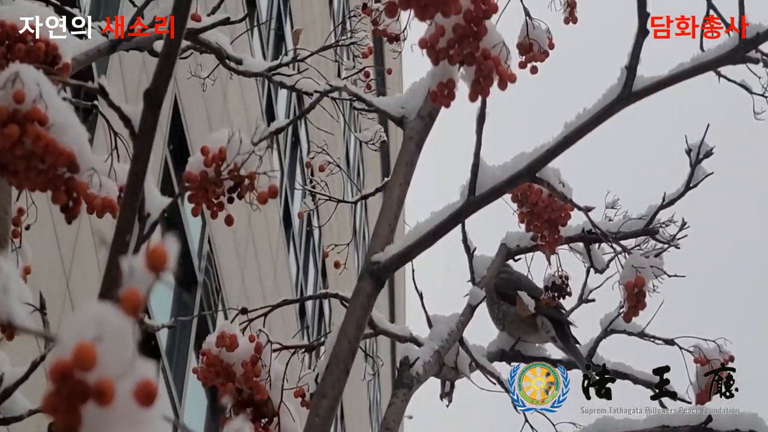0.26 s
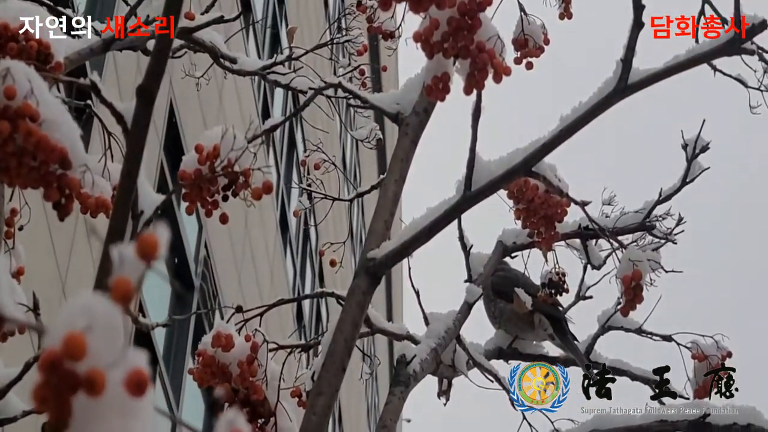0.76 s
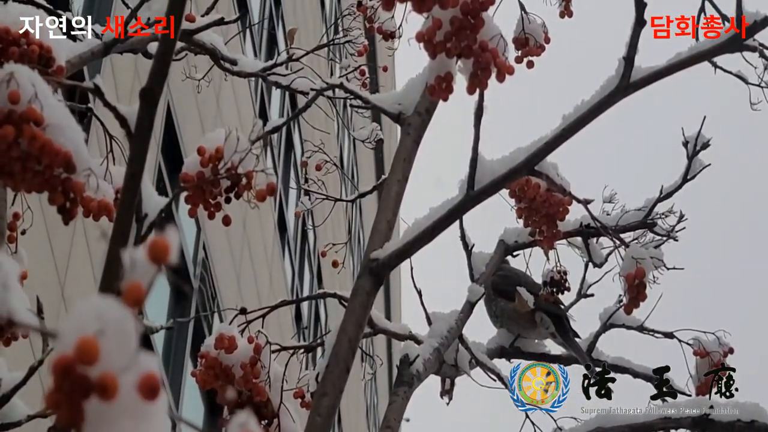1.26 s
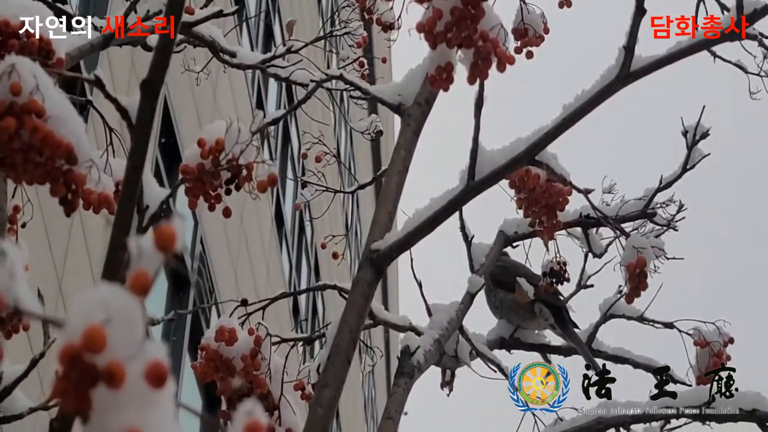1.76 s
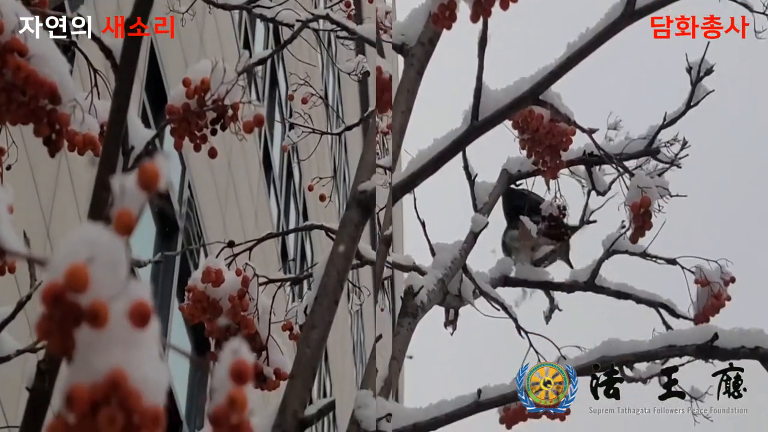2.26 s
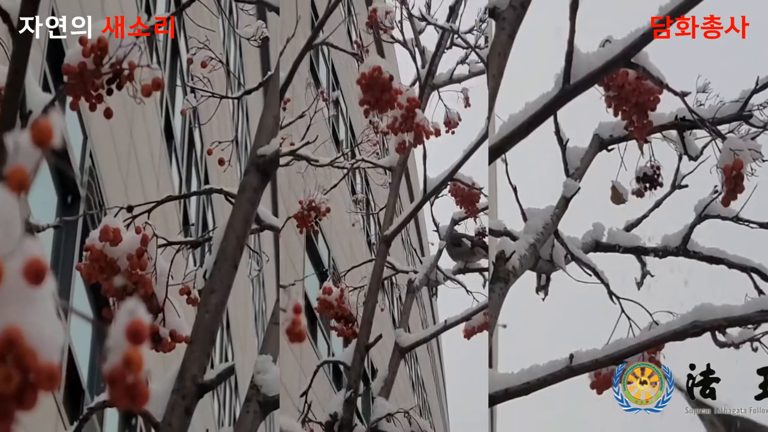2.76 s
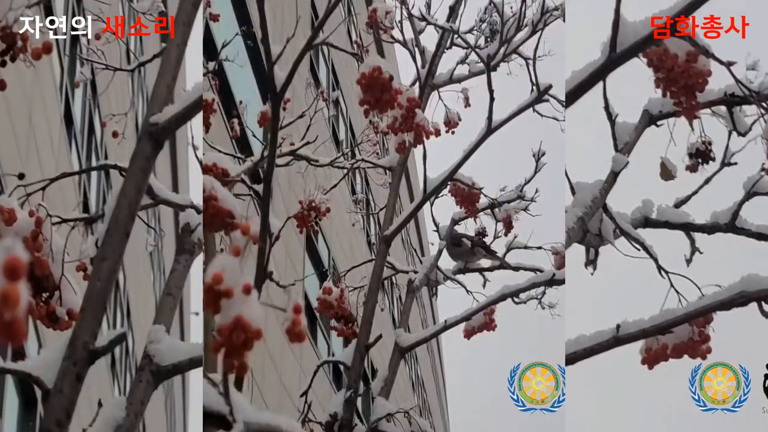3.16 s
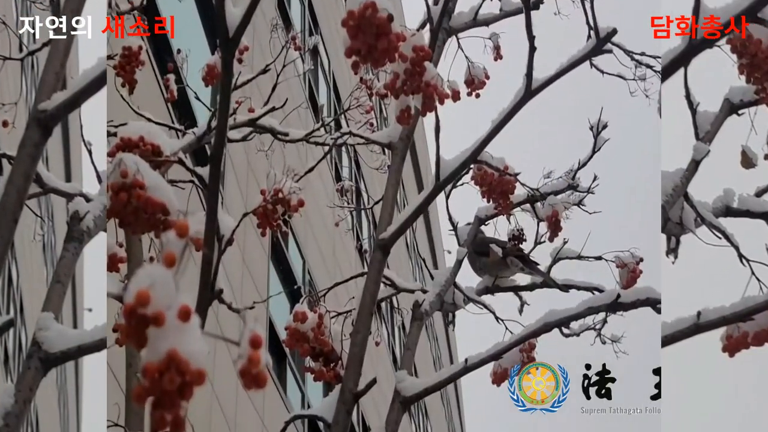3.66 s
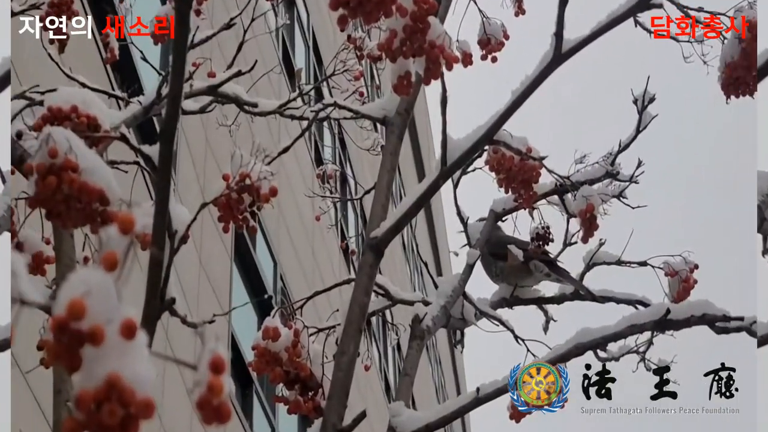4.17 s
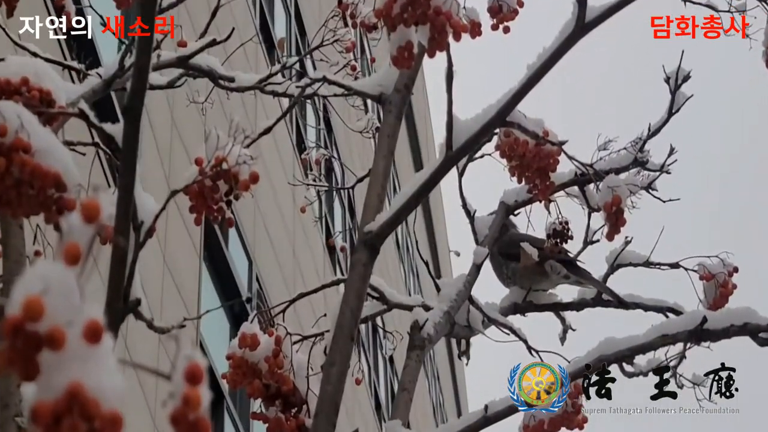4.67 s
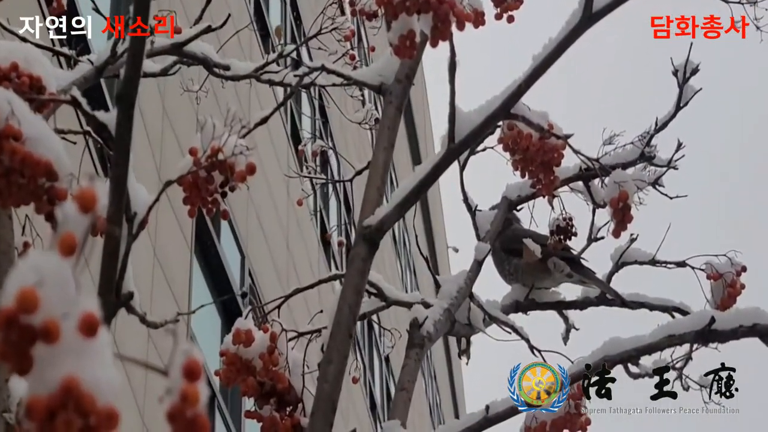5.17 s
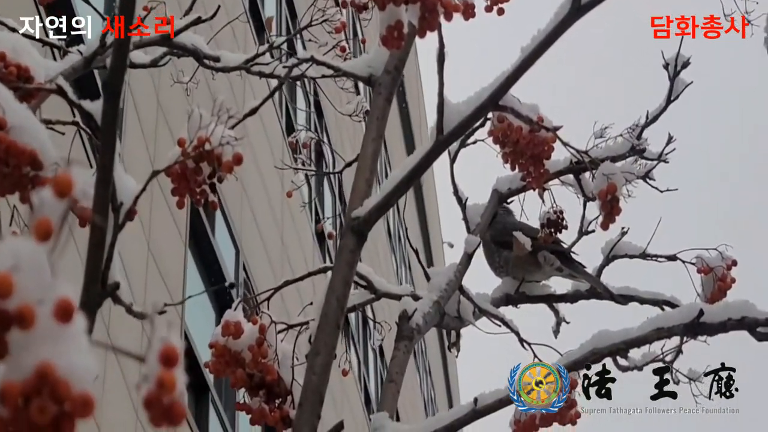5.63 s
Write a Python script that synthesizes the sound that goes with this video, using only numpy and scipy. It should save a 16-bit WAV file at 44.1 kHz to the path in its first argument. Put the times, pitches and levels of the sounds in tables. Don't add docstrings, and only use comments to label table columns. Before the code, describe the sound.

Outdoors near a building, a close stereo microphone picks up a small bird a few metres off, with short reflections. Three rough, breathy, high whistles come far apart: one already under way, one scooping up and cut short, one full and raspy with a falling end. Beneath lies distant town rumble with soft vehicle revs and hiss, one twig tick, and a brief fade near silence between the second and third calls.

```python
import sys
import numpy as np
from scipy import signal
from scipy.fft import rfft, irfft
from scipy.io import wavfile
from scipy.ndimage import uniform_filter1d, minimum_filter1d

SR = 44100
rng = np.random.default_rng(int(sys.argv[2]) if len(sys.argv) > 2 else 0)


def pcm_store(signal):
    levels = np.round(np.clip(np.atleast_2d(signal), -1, 1) * 32767)
    wavfile.write(sys.argv[1], SR, levels.astype(np.int16).T)


def undo_db(level):
    steps = np.asarray(level, float) / 20
    return 10 ** steps


N = 260190
CUT_S = 3.287


def level(x, db):
    return x * undo_db(db) / np.sqrt(np.mean(x ** 2))


def curves(table):
    s, *columns = np.transpose(table)
    return [np.interp(np.arange(N) / SR, s, c) for c in columns]


def at(table, hz):
    f, v = np.transpose(table)
    return np.interp(np.log(np.maximum(hz, 1)), np.log(f), v)


def colour(x, table):
    return irfft(rfft(x) * undo_db(at(table, np.fft.rfftfreq(N, 1 / SR))), N)


def walk(rate, count=1, size=N):
    k = max(int(SR / rate), 2)
    steps = np.repeat(rng.standard_normal((count, size // k + 1)), k, axis=1)
    w = uniform_filter1d(uniform_filter1d(steps, k, axis=1), k, axis=1)[:, :size]
    return w / w.std()


def band(x, hz, width):
    bell = np.exp(-.5 * ((np.fft.rfftfreq(N, 1 / SR) - hz) / width) ** 2)
    return irfft(rfft(x) * bell, N)


# t/s, level/dB
FADER = [(0, -0.5), (1.3, -.5), (1.7, 3), (2.1, -2), (2.75, -3.5), (3.1, -4.5), (3.286, -15.5),
         (3.289, -48.5), (3.335, -51), (3.4, -39), (3.47, -24), (3.52, -7), (3.75, -6.5), (4.2, -4),
         (4.8, -1.5), (5.9, 0.5)]
# f/Hz, level/dB (per Hz)
TOWN = [(11, -21.5), (18, -1.5), (64, 2), (120, -10), (146, -13.5), (313, -14), (415, -13), (452, -18.5),
        (551, -18), (774, -20.5), (1120, -26.5), (1760, -27.5), (4470, -45.5), (8800, -59.5),
        (15500, -72.5)]
# f/Hz, side minus mid level/dB
TOWN_SIDE = [(60, -18.5), (110, -13.5), (200, -13.5), (380, -4.5), (700, 0), (1290, 4), (2380, -2.5),
             (4400, 1), (8120, -13), (15000, 3)]


def town():
    fader_db = curves(FADER)[0]
    before = np.arange(N) < CUT_S * SR
    treble_db = -0.53 - 0.32 * np.clip(fader_db, -6, 0) * before
    mid = colour(rng.standard_normal(N), TOWN)
    side = colour(colour(rng.standard_normal(N), TOWN), TOWN_SIDE)
    spectrum = rfft(np.array([mid + side, mid - side]), axis=1)
    octave = np.log2(np.maximum(np.fft.rfftfreq(N, 1 / SR), 1))
    swell = walk(1.1)[0]
    out = 0
    for centre in range(4, 15):
        share = np.cos(np.pi / 2 * np.clip(octave - centre, -1, 1)) ** 2
        gain_db = 0.74 * swell + 1.4 * walk(7.3)[0] + treble_db * max(centre - 9, 0)
        out = out + irfft(spectrum * share, N, axis=1) * undo_db(gain_db)
    return level(out, -31.5) * undo_db(fader_db)


# t/s, hold t/s, drone level/dB, drone f/Hz, tyre hiss level/dB
TRAFFIC = [(0, .02, -33.5, 370.8, -38.5), (0.727, .02, -35, 377, -51.5), (0.955, .02, -37, 371.7, -66),
           (1.205, .02, -30.5, 373.6, -47), (1.57, .29, -27.5, 416.3, -47), (2.809, .03, -29, 411, -46),
           (3.14, .05, -34.5, 400, -66.5), (4.229, .02, -40, 360, -62), (5.244, .06, -27.5, 405, -50),
           (5.469, .02, -34.5, 371, -52), (5.867, .02, -40, 371, -61)]


def revs():
    s, hold, drone_db, hz, hiss_db = np.transpose(TRAFFIC)[..., None]
    t = np.arange(N) / SR
    rise_db_s, fall_db_s = 147.5, 100
    away_db = -rise_db_s * np.maximum(s - t, 0) - fall_db_s * np.maximum(t - s - hold, 0)
    drone_curve = np.maximum((drone_db + away_db).max(axis=0), -45.5)
    hiss_curve = np.maximum((hiss_db + away_db).max(axis=0), -63)
    return drone_curve, np.interp(t, (s + hold / 2)[:, 0], hz[:, 0]), hiss_curve


def traffic():
    drone_db, hz, hiss_db = revs()
    phase = 2 * np.pi * np.cumsum(hz) / SR
    a, b, c, d = walk(230, count=4)
    mid = a * np.sin(phase) + b * np.cos(phase)
    side = c * np.sin(phase) + d * np.cos(phase)
    ports = mid + .5 * side * np.array([[1], [-1]])
    drone = undo_db(drone_db - 8 + 2.4 * walk(14)[0]) * ports
    hiss = band(rng.standard_normal((2, N)), 1600, 1100)
    return drone + level(hiss, 0) * undo_db(hiss_db + 0.84 * walk(15)[0])


# t/s, peak level/dB, left minus right level/dB
SNAPS = [
    (1.475, -15, -12),
]


def snaps():
    out, t = np.zeros((2, N)), np.arange(200) / SR
    attack = 1 - np.exp(-t / 0.00018)
    tick = np.sin(2 * np.pi * 1500 * t) * np.exp(-t / 0.00029) * attack
    for s, db, pan_db in SNAPS:
        i = int(s * SR)
        out[:, i:i + len(t)] += undo_db(db + 6.0 + np.array([[.5], [-.5]]) * pan_db) * tick
    return out


def yard(x, t60_s=.15, wall_db=-43, far_db=-64, far_t60_s=.5):
    t = np.arange(SR // 2) / SR
    fall = undo_db(wall_db - 60 * t / t60_s) + undo_db(far_db - 60 * t / far_t60_s)
    echoes = rng.standard_normal((2, len(t))) * fall * (t > .004)
    return signal.fftconvolve(x, echoes, axes=1)[:, :N]


# t/s, level/dB, beak brightness level/dB (per octave), hoarseness level/dB
WHISTLES = [
    [(0, -22.5, -1.5, 1.5), (.22, -24.5, 0, 0), (.32, -22.5, 0.5, -0.5), (.4, -21.5, -16, 0.5),
     (.43, -20, -1, -5.5), (.59, -23, 2, -2.5), (.63, -19, -5, 4), (.672, -39, 2, 4.5), (.74, -58, 0, 9)],
    [(2.83, -49.5, 5.5, -1), (2.92, -22, 1, -2.5), (3.0, -22.5, -20, 4), (3.1, -20, -22, -3.5),
     (3.19, -22.5, -24.5, -3.5), (3.215, -30.5, -22, -8.5), (3.262, -30, -23, -5), (3.287, -34, -14, -2)],
    [(3.805, -54, -3, -10.5), (3.905, -26.5, 0, -20), (3.95, -28.5, -12, -1), (4.24, -25, 2, 0.5),
     (4.4, -29, 1, 0.5), (4.435, -24, 3.5, 0.5), (4.585, -23, -2.5, 0), (4.652, -18, 3, -2),
     (4.7, -57, -12, 10)],
]
# t/s, f/Hz
PITCH = [
    [(0, 1915), (.15, 1895), (.33, 1885), (.385, 1850), (.42, 1900), (.52, 1900), (.572, 1860)],
    [(2.83, 1700), (2.9, 1850), (2.96, 1960), (3.05, 1900), (3.15, 1885), (3.29, 1895)],
    [(3.8, 1760), (3.84, 1800), (3.88, 1870), (3.95, 1925), (4.25, 1930), (4.42, 1895), (4.54, 1835),
     (4.6, 1800)],
]
# fundamental level/dB, thirds level/dB, breath level/dB, flutter depth [factor], top
# hiss level/dB
VOICES = [
    (-6.5, -17.5, 0, .55, 2),
    (-7, -25, 0, 1.2, 0),
    (2.5, -6.5, 1, .45, 6.5),
]
# start t/s, slide start t/s, slide length t/s
PHRASES = [
    (-.2, .572, .084),
    (2.865, 9, .06),
    (3.842, 4.6, .052),
]


def syrinx(call):
    t = np.arange(N) / SR
    db, bright, hoarse_db = curves(WHISTLES[call])
    root_db, thirds_db, breath_db, flutter, top_db = VOICES[call]
    start, slide_s, length = PHRASES[call]
    slide = np.clip((t - slide_s) / length, 0, 1.04) ** 1.8
    since_start = np.maximum(t - start, 0)
    onset, settle = np.exp(-since_start / .026), np.exp(-since_start / .06)
    hz = curves(PITCH[call])[0] - 860 * slide
    root_db = root_db + .6 * hoarse_db + 16 * settle
    thirds_db = thirds_db + 2.5 * hoarse_db - 9.5 * slide
    breath_db = breath_db + hoarse_db + 18 * onset - 5 * np.sin(np.pi * np.minimum(slide, 1))
    flutter = flutter + .7 * slide + .8 * settle
    bright = bright - 36 * slide ** 2
    top_db = top_db + 8.1 * (t - start - .5) - 0.63 * hoarse_db
    return hz, root_db, thirds_db, breath_db, flutter, bright, top_db, db


# f/Hz, level/dB
THROAT = [(1200, -56), (1620, -34), (1770, -9), (1950, -4.5), (2250, -5), (2700, 1.5), (3800, -2),
          (5700, -4.5), (6700, -12.5), (7600, -11), (9400, -9), (10600, -29), (13000, -22.5), (15500, -24)]
# f/Hz, level/dB (per Hz)
BREATH = [
    [(880, -63), (1500, -38.5), (1900, -9.5), (2090, -25), (2590, -10.5), (3340, -15), (3760, -7.5),
     (5190, -12), (5780, -3), (6620, -16), (8210, -18), (13700, -32.5), (15500, -36.5)],
    [(880, -58), (1500, -34.5), (1920, -14), (2200, -17), (2940, -19), (3830, 1.5), (5140, -14),
     (5610, -15), (6620, -23.5), (7900, -19), (10500, -22.5), (12900, -24), (15500, -39)],
    [(1210, -42), (2050, -18), (2190, -22.5), (2530, -5.5), (3350, -14), (3930, -5.5), (5340, -10.5),
     (5860, -8.5), (6820, -11), (8080, -13), (10800, -24.5), (13700, -29), (15500, -33)],
]


def whistle(call):
    t = np.arange(N) / SR
    rows = WHISTLES[call]
    on = (t >= rows[0][0]) & (t < rows[-1][0])
    size = on.sum()
    hz, root_db, thirds_db, breath_db, flutter, bright, top_db, db = (c[on] for c in syrinx(call))
    jitter = .004 * walk(120, size=size)[0] + .002 * walk(25, size=size)[0]
    phase = 2 * np.pi * np.cumsum(hz * (1 + jitter)) / SR
    clear, hoarse = 0, 0
    for m in range(3, 19):
        k = m / 3
        gain = undo_db(at(THROAT, k * hz) + bright * max(np.log2(k / 2), 0) - 12.4 * (k > 3.5))
        a, b, c, d = walk(200 * k ** .6, count=4, size=size)
        a = a + .45 * k ** .3 * np.array([c, -c])
        b = b + .45 * k ** .3 * np.array([d, -d])
        cosine, sine = np.cos(k * phase), np.sin(k * phase)
        if m % 3 == 0:
            depth = flutter * .5 * k ** 0.94
            swell = undo_db(1.8 * walk(18, size=size)[0] + root_db * (m == 3)) / np.sqrt(1 + depth ** 2)
            clear = clear + gain * swell * ((1 + depth * a) * cosine + depth * b * sine)
        else:
            hoarse = hoarse + gain * undo_db(-7 * (m % 3 == 2)) * ((.1 + a) * cosine + b * sine)
    mid, side = (colour(rng.standard_normal(N), BREATH[call])[on] for _ in range(2))
    breath = mid + .5 * np.array([side, -side])
    top = signal.sosfilt(signal.butter(4, 7000, "high", fs=SR, output="sos"), breath)
    breath = (breath + (undo_db(top_db) - 1) * top) * undo_db(1.8 * walk(30, size=size)[0])
    voice = level(clear, 0) + level(hoarse, 0) * undo_db(thirds_db) + level(breath, 0) * undo_db(breath_db)
    loudness = np.sqrt(uniform_filter1d(np.mean(voice ** 2, axis=0), size=1800))
    out = np.zeros((2, N))
    out[:, on] = voice / loudness * undo_db(db)
    return out


# left port late by [samples], left minus right level/dB
BEARINGS = [
    (-1, -1.0),
    (6, -2.0),
    (1, 1.2),
]


def bird():
    out = 0
    for call, (lag, pan_db) in enumerate(BEARINGS):
        left, right = whistle(call)
        left = np.roll(left, lag) * (np.arange(N) < N - 9)
        out = out + np.array([left * undo_db(pan_db / 2), right * undo_db(-pan_db / 2)])
    return out


def thin_treble(x, patchy_db=4.0):
    hz, s, z = signal.stft(x, SR, nperseg=1536)
    bands = (np.log2(1 + hz / 3000) * 12).astype(int)
    power = [np.mean(np.abs(z[:, bands == b]) ** 2, axis=(0, 1)) for b in range(bands.max() + 1)]
    power = np.array(power)
    band_db = 10 * np.log10(uniform_filter1d(power, size=3, axis=1) + 1e-20)
    under_db = -minimum_filter1d(-band_db, size=5, axis=0) - band_db
    chance = rng.standard_normal((2, len(power), len(s) // 2 + 1))
    chance = np.repeat(chance, 2, axis=2)[..., :len(s)]
    lasting = uniform_filter1d(chance[1], size=3, axis=1) * 1.35
    reach = np.clip(np.log2(np.maximum(hz, 1) / 5000) + .5, 0, 1)[:, None]
    spared = ((under_db < 4)[bands] & (hz < 6300)[:, None]) | (hz < 1500)[:, None]
    lost = (lasting + under_db / 12)[bands] > 2.6 - 1.45 * reach + 9 * spared
    weak = np.abs(z) ** 2 < 1.3 * reach * power[bands]
    jump_db = (patchy_db * chance[0][bands] * (1 - 0.22 * spared) + 5.5) * reach
    gain = undo_db(jump_db) * ~lost * ~weak * (hz < 15300)[:, None]
    return signal.istft(z * gain, SR, nperseg=1536)[1][:, :N]


def scene():
    voice = bird()
    before = np.arange(N) < int(CUT_S * SR)
    echoes = yard(voice * before) * before + yard(voice * ~before)
    traffic_fade = np.minimum(undo_db(curves(FADER)[0] + 15.5), 1)
    return voice + echoes + town() + traffic() * traffic_fade + snaps()


def top_cut(x):
    return signal.sosfilt(signal.butter(12, 15730, fs=SR, output="sos"), x)


def record(dry):
    before = np.arange(N) < int(CUT_S * SR)
    first = thin_treble(dry * before) * before
    second = thin_treble(dry * ~before) * ~before
    return top_cut(first + second)


dry = scene()
out = record(dry)
pcm_store(out)
```